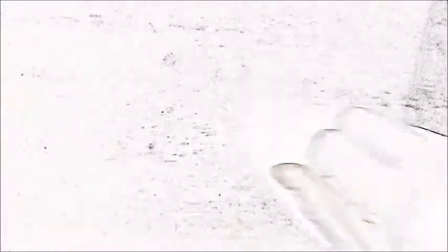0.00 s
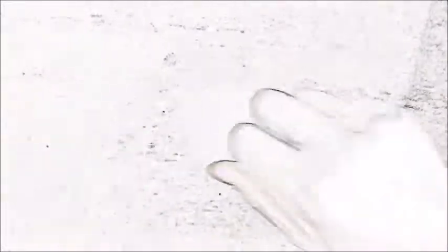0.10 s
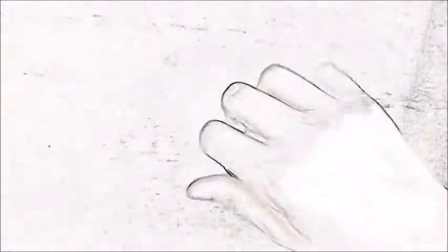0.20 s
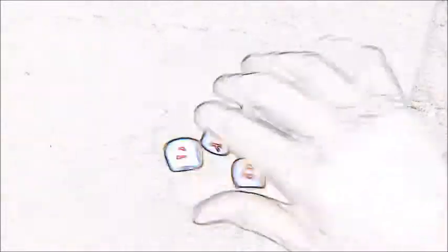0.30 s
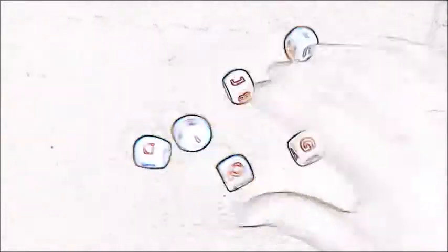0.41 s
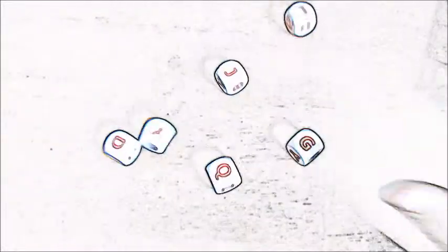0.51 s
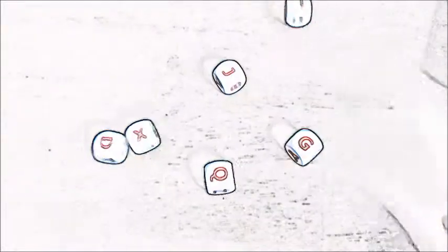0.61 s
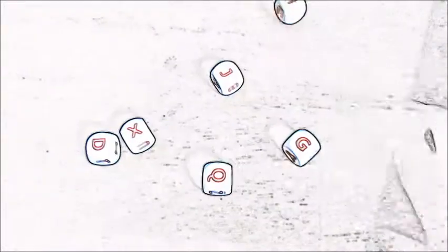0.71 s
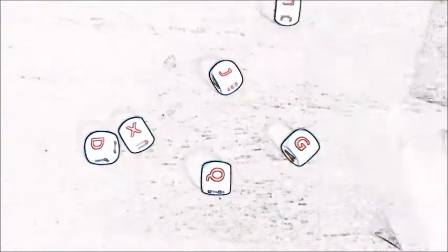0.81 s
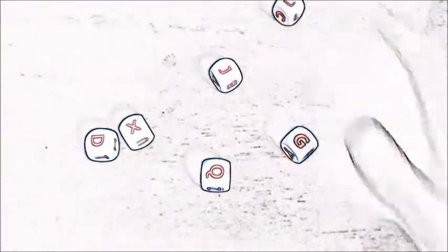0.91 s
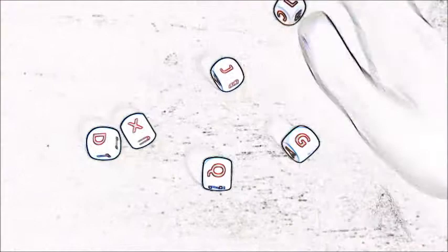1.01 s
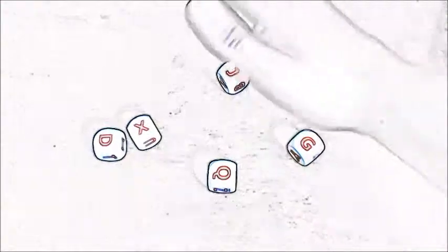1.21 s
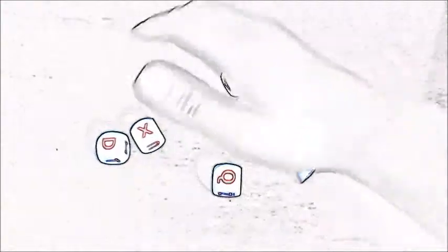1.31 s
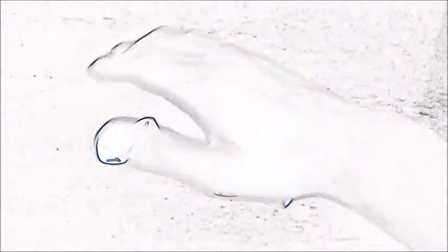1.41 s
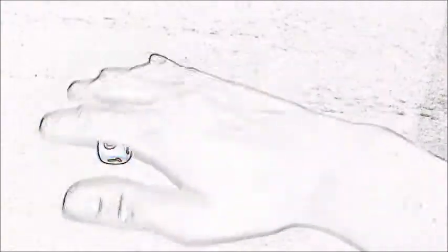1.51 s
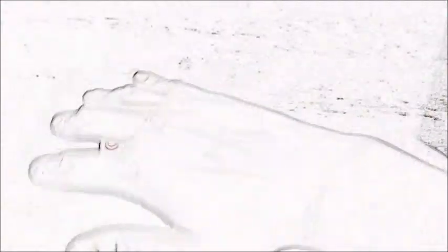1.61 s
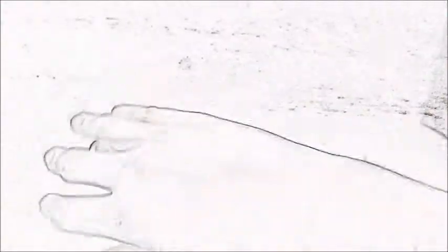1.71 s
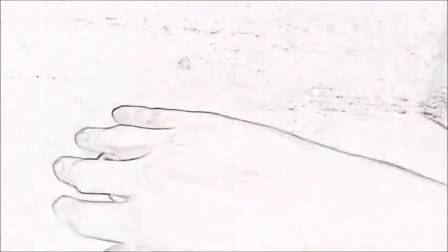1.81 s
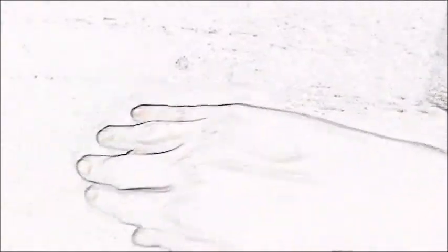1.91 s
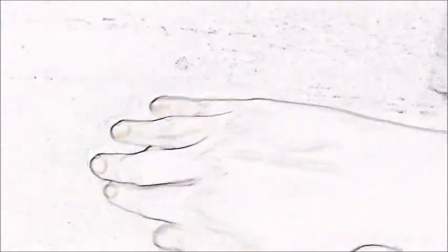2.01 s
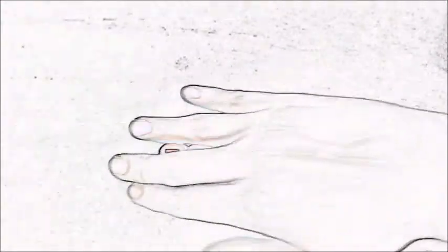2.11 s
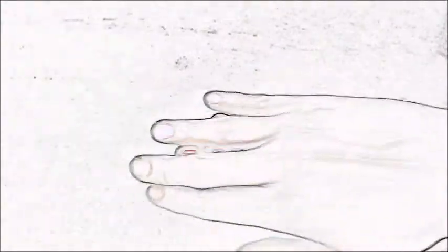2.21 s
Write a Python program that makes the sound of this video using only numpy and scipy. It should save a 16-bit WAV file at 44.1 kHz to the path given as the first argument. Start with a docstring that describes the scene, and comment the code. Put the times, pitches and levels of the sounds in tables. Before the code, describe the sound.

Dice on a wooden table, close up in a small room. One small click in the fist at 0.1 s, then a loud hard landing at 0.23 s and a dense clatter of bounces, thinning after 0.65 s into soft rolling ticks until 1.0 s. A quiet gap, then from 1.2 to 2.2 s a hand sweeps them with grainy scraping and small clicks. Faint rumble and hiss.

```python
"""A small room, a wooden table close by: dice click once in the fist, are thrown, bounce, roll and come
to rest, then a hand sweeps them together. Blows are a graze, an impulse and a noise chatter, filtered
to a colour; rolling and scraping are trains of tiny random impacts, and the brushing hand is noise.
The tabletop adds resonant modes and a dense short decay, the room a diffuse decay; rumble, hiss and
a faint whine lie underneath."""
import sys
import numpy as np
from scipy import signal
from scipy.fft import rfft, irfft, next_fast_len
from scipy.io import wavfile
from scipy.ndimage import uniform_filter1d, minimum_filter1d, map_coordinates

SR = 44100
rng = np.random.default_rng(int(sys.argv[2]) if len(sys.argv) > 2 else 0)


def dump_mix(stems):
    """Bounce the given channels to the path in sys.argv[1] as a 16-bit WAV at rate SR."""
    frames = np.atleast_2d(stems).T  # one column per channel
    limited = np.clip(frames, -1, 1)  # hard clip at full scale
    pcm = np.round(limited * 32767).astype(np.int16)
    wavfile.write(sys.argv[1], SR, pcm)


N = 99225

# Spectral tilt of a brighter or duller contact, scaled for each blow: frequency_hz, weight
TREBLE_TILT = [(2200, 0.13), (4500, 0.88), (6000, 1.41), (12000, 1.97)]
PLAIN_BLOW_DB = -15  # blow level at which chatter length and strength take their nominal values


def amp(db):
    """Decibels to amplitude gain: 20 dB for each factor of ten."""
    return 10 ** (np.asarray(db) / 20)


def unit(x):
    """Normalization: x scaled to rms 1."""
    return x / np.sqrt(np.mean(x ** 2) + 1e-20)


def along(points, hz):
    """Linear interpolation of (Hz, value) points on a logarithmic frequency axis."""
    f, v = np.transpose(points)
    return np.interp(np.log(hz + 1), np.log(f + 1), v)


def level(rows):
    """Amplitude envelope, linear in decibels between (s, dB) rows; -120 dB before the first."""
    s, db = np.transpose(rows)
    return amp(np.interp(np.arange(N) / SR, s, db, left=-120))


def causal(db_at, size=2048):
    """Minimum-phase impulse response of energy 1 with spectral shape db_at(Hz), by cepstral folding."""
    cepstrum = irfft(np.log(amp(db_at(np.fft.rfftfreq(size, 1 / SR)))))
    cepstrum[1:size // 2] *= 2
    cepstrum[size // 2 + 1:] = 0
    h = irfft(np.exp(rfft(cepstrum)))
    return h / np.linalg.norm(h)


def coloured(x, colour):
    """Linear filtering: x through a spectrum of (Hz, dB) points, at rms 1."""
    h = causal(lambda hz: along(colour, hz), size=8192)
    return unit(signal.fftconvolve(x, h)[:N])


def add(track, s, sound):
    """Superposition: mix a sound into the track at time s."""
    part = track[round(s * SR):][:len(sound)]
    part += sound[:len(part)]


def grains(per_s, spread_db):
    """Poisson-like train of tiny impacts with random times, sizes and signs."""
    present = rng.random(N) < per_s / SR
    size = amp(spread_db * np.clip(rng.standard_normal(N), -2, 2))
    return present * size * rng.choice([-1, 1], N)


def wobble(per_s):
    """Smooth random modulation: spline through per_s independent normal values a second."""
    return map_coordinates(rng.standard_normal(N // 50), [np.arange(N) * per_s / SR], mode="mirror")


def tail(t60, size):
    """Diffuse decay of energy 1: noise whose frequencies each die away with their own t60."""
    hz, t, z = signal.stft(rng.standard_normal(size), SR, nperseg=128)
    h = signal.istft(z * amp(-60 * t / along(t60, hz)[:, None]), SR)[1]
    return h / np.linalg.norm(h)


def tap(db, t60, db_at):
    """Contact force as graze, impulse and chatter decaying over t60, evened out to the colour db_at(Hz)."""
    blow_lag_s, graze_db = 0.0013, -13  # the graze grows until the blow
    chatter_db, chatter_db_per_db = 7, -0.05  # chatter against blow; relatively weaker in harder blows
    t = np.arange(SR // 25) / SR
    graze = amp(graze_db) * t / blow_lag_s
    decay = amp(-60 * (t - blow_lag_s) / t60)
    chatter = rng.standard_normal(len(t)) * np.where(t < blow_lag_s, graze, decay)
    chatter_gain = amp(chatter_db + chatter_db_per_db * (db - PLAIN_BLOW_DB))
    force = chatter_gain * chatter / np.linalg.norm(chatter)
    force[round(blow_lag_s * SR)] -= 1
    # the filter compensates the smoothed spectrum of this force
    uneven_db = 10 * np.log10(uniform_filter1d(np.abs(rfft(force, 2048)) ** 2, size=21))
    sound = signal.fftconvolve(force, causal(lambda hz: db_at(hz) - uneven_db))
    return amp(db) * sound / np.linalg.norm(sound)


def background():
    """Stationary broadband noise, heard as rumble and hiss, plus one faint pure tone."""
    # Spectrum of rumble and hiss: frequency_hz, relative_level_db
    floor_colour = [(20, 2), (45, 3.5), (80, -2.5), (140, -0.5), (280, -10), (400, -9.5), (1200, -12.5),
                    (3000, -22.5), (7000, -29), (15000, -48.5)]
    floor_db, whine_hz, whine_db = -57.5, 11830, -86
    whine = amp(whine_db) * np.sin(2 * np.pi * whine_hz * np.arange(N) / SR)
    return amp(floor_db) * coloured(rng.standard_normal(N), floor_colour) + whine


def corner_scrape():
    """Catching contact: dice corners on the skin, later in the wood grain, as sparse impacts."""
    # Strength of the scrape: time_s, level_db
    scrape_level = [(.11, -62), (.18, -55.5), (.21, -95.5), (1.21, -94), (1.228, -55), (1.33, -60),
                    (1.4, -40.5), (1.47, -43.5), (1.65, -70), (1.75, -46), (1.82, -52), (1.98, -40),
                    (2.1, -68)]
    # Spectrum of the scrape: frequency_hz, relative_level_db
    scrape_colour = [(500, -21), (2000, -4.5), (2600, 8), (3800, -4), (5400, -8), (7000, -30),
                     (15000, -45.5)]
    catches = grains(per_s=260, spread_db=1.5)
    return level(scrape_level) * coloured(catches, scrape_colour)


def tabletop(x):
    """Modal resonance: a few long modes, and a dense short decay redrawn at regular steps."""
    # Long modes of the top: frequency_hz, gain_at_resonance_db, t60_s
    table_modes = [(232.2, 15.5, .33), (325.3, 9, 0.39), (434.4, -1, 0.28), (506.3, -1.5, .35),
                   (659.6, 6, 0.5), (830, -11.5, 0.7), (980.6, 6, 0.29), (1046, 4.5, 0.17), (1188, 0, 0.23),
                   (1303, -7, 0.3), (1380, -22, 0.45), (1518, -12, 0.31), (1774.4, 3.5, 0.099),
                   (1770, -8.5, .3), (2003, 0.5, 0.34), (2326, 1.5, 0.087), (2433, -2.5, 0.12),
                   (2540, -1, 0.44), (2890, 0, 0.11), (3100, 5.5, 0.13), (3926, 2.5, 0.35)]
    # Decay of the dense short modes: frequency_hz, t60_s
    board_decay = [(200, 0.32), (1500, 0.074), (3500, 0.04), (9000, 0.016)]
    board_db, board_renew_s = -10, 0.04
    t = np.arange(SR // 2) / SR
    ring = np.zeros(len(t))
    for hz, db, t60 in table_modes:
        resonance_scale = 2 * np.log(1000) / (t60 * SR)  # makes the peak gain amp(db)
        ring += amp(db - 60 * t / t60) * resonance_scale * np.cos(2 * np.pi * hz * t)
    board, step = np.zeros(N), round(board_renew_s * SR)
    window = signal.get_window("hann", 2 * step)
    for start in range(0, N - step, step):
        part = x[start:start + 2 * step]
        response = signal.fftconvolve(part * window[:len(part)], tail(board_decay, size=6000))
        add(board, start / SR, response)
    return x + signal.fftconvolve(x, ring)[:N] + amp(board_db) * board


def room_response(near):
    """Reverberation: convolution with a diffuse decay whose length depends on frequency."""
    # Reverberation time of the room: frequency_hz, t60_s
    room_decay = [(200, 0.12), (1500, 0.51), (4000, 0.32), (12000, 0.38)]
    room_db = -12
    return amp(room_db) * signal.fftconvolve(near, tail(room_decay, size=SR // 2))[:N]


def fist_click(attack_s=0.0022):
    """Cavity resonance: two dice meet and the hollow of the hand rings in damped modes."""
    # Modes of the hollow fist, before the click's own gain: frequency_hz, level_db, t60_s
    fist_modes = [(1470, -10, 0.012), (1690, -11, 0.013), (3230, -1.5, 0.0071), (3440, 5.5, 0.0051),
                  (5200, -0.5, 0.003), (7260, -30.5, 0.0077)]
    click_s, click_db = 0.1146, -7.5
    track, t = np.zeros(N), np.arange(SR // 20) / SR
    ring = sum(amp(db - 60 * t / t60) * np.sin(2 * np.pi * hz * t) for hz, db, t60 in fist_modes)
    add(track, click_s, amp(click_db) * ring * (1 - np.exp(-t / attack_s)))
    return track


def bounces(gain_db=11):
    """Impact excitation: each landing is a blow whose chatter lasts longer when it is weaker."""
    # Dice landing on the table, before the common gain:
    # start_s, level_db, extra_knock_db (near 1.8 kHz), extra_treble_db (times the tilt's weight)
    landings = [(0.2341, 3.5, 3.5, -11.5), (0.2413, -16, -9, 5), (0.2526, -5.5, 12, -1),
                (0.261, -23, 15, -16), (0.2967, 2, 9.5, 2.5), (0.3081, -3, 3, -6), (0.3123, -2.5, 10, -1.5),
                (0.3217, -20, 0, 4), (.328, -13.5, 8, -3), (0.3378, -21, 13, 5), (.343, -11, -4, -8),
                (0.361, -12.5, 12, 2), (0.3659, -14, -11, -7), (0.3763, -9.5, 7, -8), (0.381, -12, -10, 5),
                (0.3843, -4, 6.5, -6.5), (0.392, -14.5, -12, -2), (0.422, -5.5, 13.5, 1),
                (.428, -12, -4, 5), (0.435, -11, 4, 5), (0.437, -11.5, -9, 7), (.449, -5.5, 14, -4.5),
                (0.464, -14.5, 6, -4), (0.4829, -8.5, 17, 14), (0.4933, -15.5, -2, 15.5),
                (0.5002, -13.5, 26, 11.5), (0.5069, -5.5, 8, 1.5), (0.535, -10.5, 6, 8),
                (0.543, -12, -3, 4), (0.551, -18.5, -1, 3), (0.561, -23, -13, 10), (0.565, -16, -16, -3),
                (0.5738, -6, -5, 4), (0.5813, -11.5, 2, 8), (0.5921, -22.5, 17, 15.5),
                (0.604, -19.5, -11, -5), (.611, -16.5, 10, 11), (0.6158, -12.5, -17, 2),
                (0.632, -18.5, -15, -5), (0.64, -8, -4, 7.5), (0.6434, -10, -12, 2.5), (0.6668, -17, -2, 7),
                (0.684, -22.5, 2, -12), (0.7049, -13.5, -2, 4), (0.726, -25, -2, -14),
                (0.745, -17, -12, -0.5), (0.7672, -15.5, -5, 2.5), (.794, -25.5, -10.5, -25),
                (.824, -25, -24, -25), (0.8514, -23, -30, -28), (0.877, -24.5, -9.5, -12),
                (0.9049, -24.5, -12.5, -4), (0.931, -25, 12, -19.5), (0.949, -23.5, 3, -3),
                (.982, -23, 4.5, 1.5)]
    # Spectrum of a landing: frequency_hz, relative_level_db
    bounce_colour = [(60, -43.5), (170, -25), (260, -13), (370, -2.5), (620, -9.5), (1000, -2.5),
                     (1250, 0.5), (1800, 1), (2150, -5.5), (2450, 6), (2850, 0.5), (3150, 0.5),
                     (3900, -1.5), (5400, -8.5), (6000, -17.5), (7000, -20.5), (9000, -36.5), (15000, -69)]
    # Spectral shape of the extra knock: frequency_hz, weight
    knock_shape = [(1350, 0.28), (1720, 0.77), (1850, 0.94), (2500, 0)]
    plain_t60_s, softer_db_per_db = 0.018, 0.27  # a weak blow rocks on its edge for longer
    track = np.zeros(N)
    for s, db, knock_db, treble_db in landings:
        def colour_db(hz):
            extra_db = knock_db * along(knock_shape, hz) + treble_db * along(TREBLE_TILT, hz)
            return along(bounce_colour, hz) + extra_db
        t60 = plain_t60_s * amp(-softer_db_per_db * (db - PLAIN_BLOW_DB))
        add(track, s, tap(db, t60, colour_db))
    return amp(gain_db) * track


def rolling():
    """Repeated small impacts: a dense rattle of edges and sparser ticks of grazing corners."""
    # Strength of the small contacts: time_s, level_db
    roll_level = [(.236, -62), (.25, -46), (.29, -51), (.32, -29.5), (.41, -32), (.44, -28.5), (.52, -34),
                  (.565, -27.5), (.61, -33.5), (.69, -38), (.78, -41), (.82, -46), (.94, -43.5),
                  (.985, -38), (1.01, -46), (1.04, -100)]
    # Spectrum of the rolling edges: frequency_hz, relative_level_db
    roll_colour = [(100, -35), (220, -12.5), (340, 4), (650, 0.5), (1100, -4.5), (1800, -1), (2100, 0.5),
                   (2700, 4.5), (3200, 4.5), (3600, -11), (5400, -12.5), (6300, -33.5), (9000, -58.5),
                   (15000, -51)]
    # Spectrum of the grazing corners: frequency_hz, relative_level_db
    tick_colour = [(300, -24), (1500, 3), (3000, 13.5), (5400, 13), (6200, -16.5), (9000, -22.5),
                   (15000, -37.5)]
    tick_db = -18.5  # against the rattle
    rattle = coloured(grains(per_s=600, spread_db=1.5), roll_colour)
    ticks = coloured(grains(per_s=89, spread_db=2.5), tick_colour)
    return level(roll_level) * (rattle + amp(tick_db) * ticks)


def hollow_ring():
    """Sustained resonance: a low table mode kept sounding by rolling dice, with drifting phase."""
    # Strength of the ring: time_s, level_db
    ring_level = [(.24, -37), (.31, -45.5), (.45, -34), (.5, -41), (.57, -31), (.61, -47), (.72, -74)]
    ring_hz, drift_rad, drift_per_s = 325.3, 0.34, 8.3
    phase = 2 * np.pi * ring_hz * np.arange(N) / SR + drift_rad * wobble(drift_per_s)
    return level(ring_level) * unit(np.sin(phase))


def hand_brush():
    """Friction noise: skin brushing the table is broadband noise with a set spectrum."""
    # Strength of the brushing: time_s, level_db
    skin_level = [(.955, -94), (.975, -57), (1.0, -64), (1.02, -101), (1.1, -79), (1.22, -62.5),
                  (1.33, -64.5), (1.41, -64), (1.46, -57), (1.53, -69), (1.75, -63.5), (2.1, -78),
                  (2.25, -88)]
    # Spectrum of the brushing: frequency_hz, relative_level_db
    skin_colour = [(500, -25), (2500, -5), (5300, 13), (7500, 2.5), (10000, -4), (15000, -17)]
    return level(skin_level) * coloured(rng.standard_normal(N), skin_colour)


def sliding():
    """Stick-slip friction: dense impacts from three dice, each die's strength wandering by itself."""
    # Strength of dice pushed over the table, before the common gain: time_s, level_db
    slide_level = [(1.215, -84), (1.228, -46.5), (1.33, -50), (1.39, -40.5), (1.46, -35.5), (1.53, -41),
                   (1.58, -39.5), (1.66, -46.5), (1.72, -37), (1.82, -39), (1.92, -35.5), (1.98, -33.5),
                   (2.06, -37), (2.13, -42), (2.2, -49), (2.245, -38)]
    # Spectrum of the sliding: frequency_hz, relative_level_db
    slide_colour = [(100, -17.5), (220, -21), (290, -17), (340, -4), (620, -7.5), (800, -7.5), (1100, 0),
                    (1700, 2), (2050, -8), (2400, -1.5), (3100, -11.5), (3500, -15), (5600, -24.5),
                    (7200, -37.5), (10000, -53), (15000, -63)]
    gain_db, dice, impacts_per_s, catch_db, catch_per_s = -0.5, 3, 2200, 3.5, 65
    rubs = np.zeros(N)
    for _ in range(dice):
        rubs += grains(impacts_per_s / dice, spread_db=2.5) * amp(catch_db * wobble(catch_per_s))
    return amp(gain_db) * level(slide_level) * coloured(rubs, slide_colour)


def die_clicks(gain_db=10):
    """Short hard contact: die meets die under the hand, coloured by the hollow's resonance."""
    # Die against die, before the common gain:
    # start_s, level_db, hollow_pitch_hz, hollow_height_db, extra_treble_db (times the tilt's weight)
    meetings = [(1.411, -21.5, 4400, 11, 3.5), (1.5975, -11, 4400, 3, 2), (1.678, -17.5, 3260, -7, 0),
                (1.681, -20, 5800, 4, 6), (1.685, -13.5, 3650, 10, -4), (1.689, -19.5, 10000, 14.5, 9),
                (1.7, -21.5, 5000, -2, 5.5), (1.716, -19.5, 2400, -1, -2), (1.734, -14.5, 3000, 13, -6),
                (1.7379, -13, 3500, 11, 2.5), (1.812, -20.5, 4070, 3, -1.5),
                (1.8475, -14, 5660, 12.5, -2.5), (1.9172, -22, 4800, 8, 2), (2.1887, -30, 3900, 8, -11),
                (2.212, -23, 3740, 18.5, 15.5), (2.229, -29, 3450, 2, 5)]
    # Spectrum of a click: frequency_hz, relative_level_db
    click_colour = [(100, -36), (330, 3), (700, -0.5), (1200, 2), (2400, 5.5), (3300, -1.5), (3600, 0.5),
                    (4300, -3), (5200, -2.5), (6800, -17), (7400, -17.5), (10500, -40), (15000, -61)]
    click_t60_s, half_width_octaves = 0.014, 0.17
    track = np.zeros(N)
    for s, db, hollow_hz, hollow_db, treble_db in meetings:
        def colour_db(hz):
            detuning = np.log2((hz + 1) / hollow_hz) / half_width_octaves
            hollow = hollow_db / (1 + detuning ** 2)
            return along(click_colour, hz) + hollow + treble_db * along(TREBLE_TILT, hz)
        add(track, s, tap(db, click_t60_s, colour_db))
    return amp(gain_db) * track


def scene():
    """Superposition of direct sound, table resonance, reverberation and background."""
    contacts = corner_scrape() + bounces() + rolling() + sliding() + die_clicks()
    near = tabletop(contacts) + fist_click() + hollow_ring() + hand_brush()
    return (near + room_response(near) + background())[None]


def record(dry):
    """Peak limiting by a smoothed gain, then a sharp low-pass band limit."""
    ceiling, limiter_s, top_hz = 1.46, 0.0015, 15600
    span = max(2, round(limiter_s * SR))
    needed_gain = ceiling / np.maximum(np.abs(dry), ceiling)
    gain = uniform_filter1d(minimum_filter1d(needed_gain, span), span)
    size = next_fast_len(N + SR // 2)
    passband = np.fft.rfftfreq(size, 1 / SR) < top_hz
    return irfft(rfft(dry * gain, size) * passband, size)[..., :N]


dry = scene()
out = record(dry)
dump_mix(out)
```